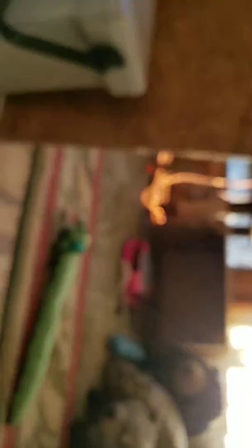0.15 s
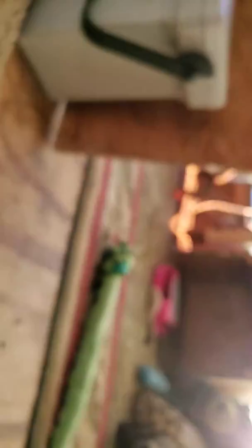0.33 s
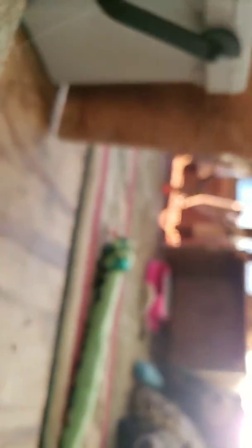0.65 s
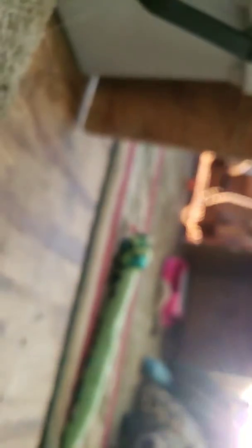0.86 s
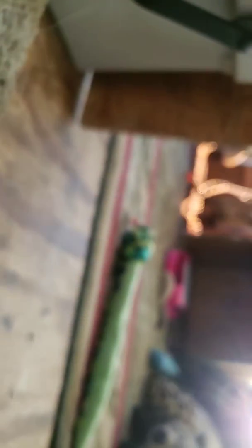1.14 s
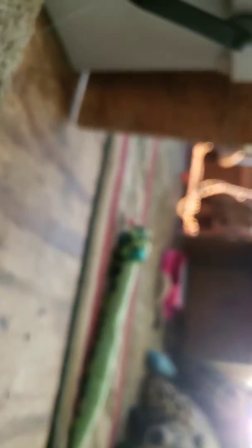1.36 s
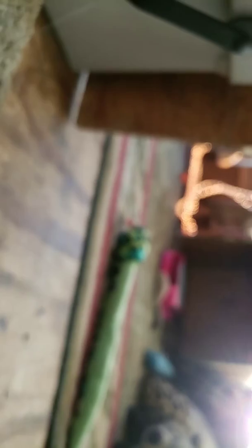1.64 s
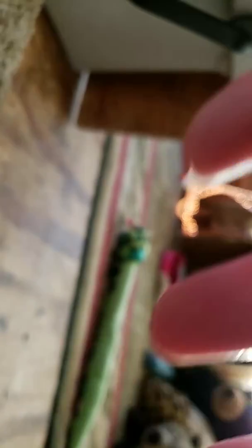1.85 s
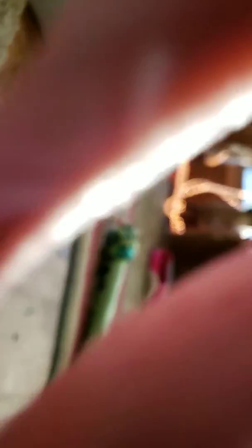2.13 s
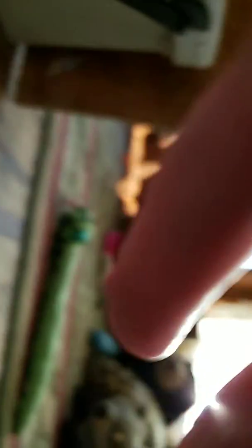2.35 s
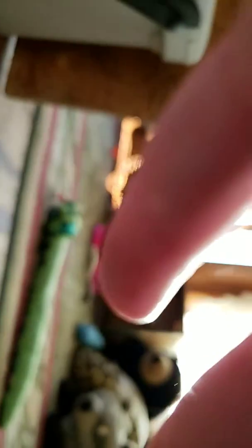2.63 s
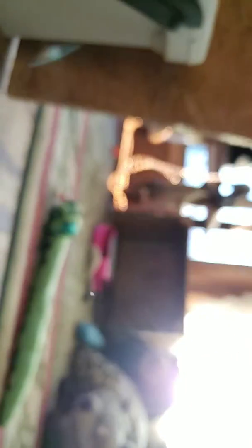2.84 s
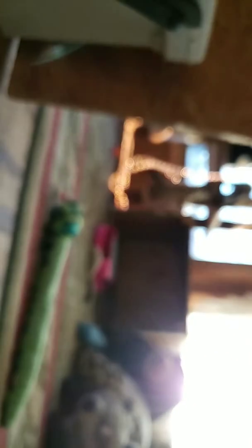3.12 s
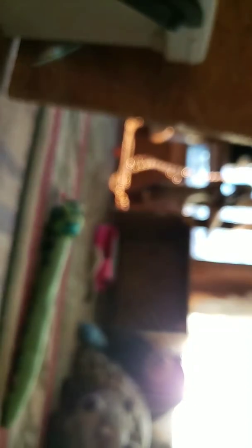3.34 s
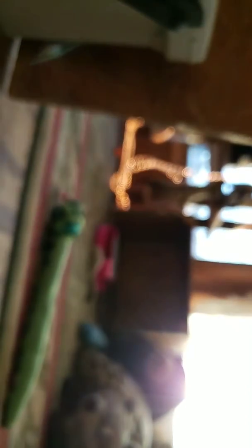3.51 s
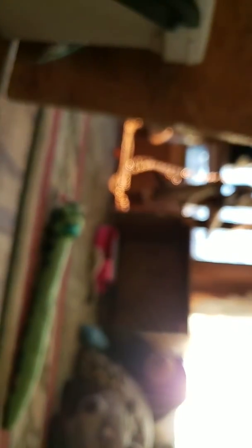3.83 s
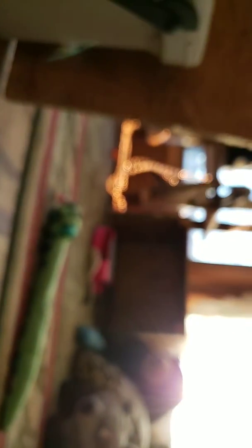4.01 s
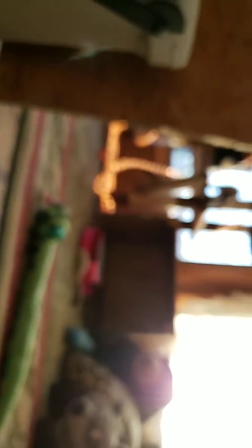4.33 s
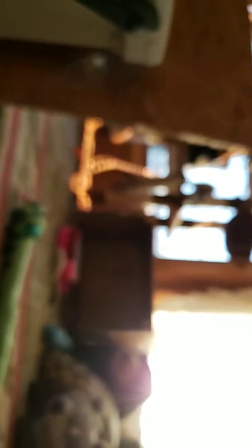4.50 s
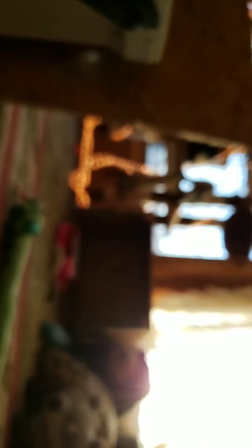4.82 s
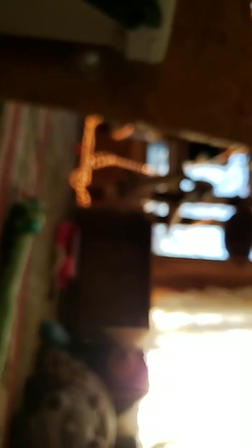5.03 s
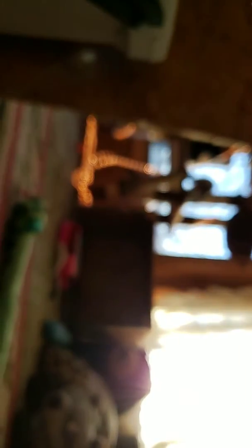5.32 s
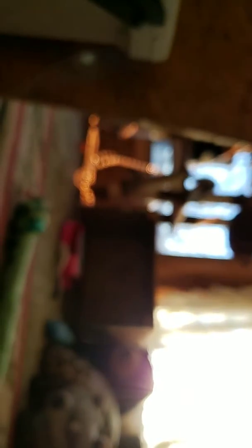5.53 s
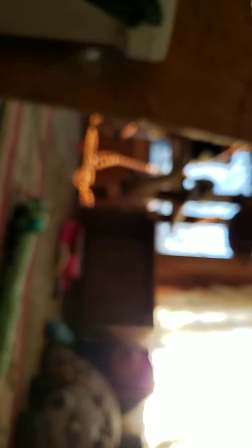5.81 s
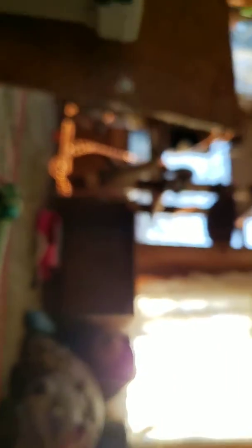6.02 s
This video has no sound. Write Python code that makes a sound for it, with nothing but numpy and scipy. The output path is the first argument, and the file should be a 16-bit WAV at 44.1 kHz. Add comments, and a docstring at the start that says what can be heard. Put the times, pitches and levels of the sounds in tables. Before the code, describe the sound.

Very close handling noise on a stereo hand-held camera: first an uneven hissing palm slide with dull catches and knocks, then crisp skin clicks and bright scuffs mostly on the left. A far motor throbs low in the small room, and padded thuds come and go. After a calmer stretch with few ticks, a weak kitten-like squeak slides upward over a scrape, and a run of woody knocks closes the scene.

```python
"""A quiet room where kittens play on a rug, heard through a hand-held camera with two microphone ports.
From the start a palm slides on the case, hissing and rubbing for two seconds, and slips make the case knock.
A far appliance hums and its motor runs in a steady beat; soft thuds, filtered noise bursts, begin within a second.
Then skin ticks and scuffs beside the left port: sharp releases ring its cavity and dense slips hiss.
Near the end one faint harmonic squeak dips and rises, and knocks in quick succession make the case creak."""
import sys
import numpy as np
from scipy import signal
from scipy.fft import rfft, irfft, next_fast_len
from scipy.io import wavfile

SR = 44100
rng = np.random.default_rng(int(sys.argv[2]) if len(sys.argv) > 2 else 0)


def store_pcm(level_fs):
    """Save levels as 16-bit WAV."""
    pcm = np.round(np.clip(level_fs, -1, 1) * 32767).astype(np.int16)
    wavfile.write(sys.argv[1], SR, np.atleast_2d(pcm).T)


N = 271587
TIME = np.arange(N) / SR
LONG = next_fast_len(N, real=True)

# strength of the palm's slide: t/s, reference level/dB
PALM_SLIDE = [(0.0, -60.5), (0.38, -69), (0.612, -66), (1.042, -59.5), (1.48, -62.5), (1.72, -67.5),
              (1.9, -77.5)]
PALM_OFF_S = 1.93  # the rub and the catches end, the last hiss begins to fade
# a fingertip ticks at the left port, then slides on briefly:
# t/s, tick level/dB, tilt/(dB per octave), slide level/dB, right port gain/dB
FINGER_TOUCHES = [(1.9085, -20.5, 4, -54, -26.5), (1.954, -19.5, 2, -45.5, -20),
                  (1.9855, -0.5, 2, -48, -10.5), (2.267, -28.5, 5.5, -66, -10), (2.385, -23, 0, -64.5, -7),
                  (2.4719, -20.5, -1, -60, -4.5), (2.6552, -21, 7.5, -55.5, -17), (2.7052, -1, 6, -60, -22),
                  (3.3097, -24, 9.5, -54, -16), (3.978, 11.5, 4.5, -57.5, -22),
                  (4.046, -33.5, 10, -65, -10), (4.234, -46.5, 15, -64, -18), (4.5637, -36, 6, -66.5, -16),
                  (4.8715, -41, 11.5, -68, -5)]


def amp(db):
    """Level law: decibels to an amplitude ratio."""
    return np.exp(np.asarray(db) * (np.log(10) / 20))


def unit(x):
    """Normalisation to a root mean square of one."""
    return x / np.sqrt(np.mean(x ** 2) + 1e-24)


def read(points, hz):
    """Linear interpolation of a spectrum on a logarithmic frequency axis."""
    f, value = np.transpose(points)
    return np.interp(np.log(hz + 1), np.log(f + 1), value)


def add(mix, s, sound):
    """Superposition: a two-channel sound is summed into the mix at time s."""
    part = mix[:, max(round(s * SR), 0):][:, :sound.shape[1]]
    part += sound[:, :part.shape[1]]


def drift(size, rate_hz):
    """Slow random modulation: straight lines join independent normal values, for an rms of about one."""
    steps = np.arange(size) * 2 * rate_hz / SR
    knots = rng.standard_normal(int(steps[-1]) + 2)
    return np.interp(steps, np.arange(len(knots)), knots) * np.sqrt(3 / 2)


def ports(right_db):
    """Interchannel level difference: gains of the left and right port."""
    return np.array([[1], [amp(right_db)]])


def noise(colour, balance=((1, 0), (2, 0))):
    """Partial coherence: coloured noise, alike at both ports in the bass; their mean has an rms of one."""
    # f/Hz, likeness of left and right (1 = identical)
    likeness = [(60, 0.9), (150, 0.89), (380, 0.29), (950, 0.24), (2380, 0.0067), (5980, 0), (15000, 0.14)]
    f = np.fft.rfftfreq(LONG, 1 / SR)
    a, b = rng.standard_normal((2, 2 * len(f))).view(complex)
    same = np.clip(read(likeness, f), -1, 1)
    lean = amp(read(balance, f) / 2)  # half the level difference goes to each port
    left = a * lean
    right = (same * a + np.sqrt(1 - same ** 2) * b) / lean
    x = irfft(np.array([left, right]) * amp(read(colour, f)), LONG)[:, :N]
    return x / x.mean(0).std()


def still_room(level_db=-74.5):
    """Stationary random noise: the faint background of the still room."""
    # f/Hz, level/dB
    colour = [(100, -8.5), (220, -6), (450, -8.5), (620, -11), (870, -6.5), (1400, -17), (1950, -15),
              (2350, -7), (3000, -16), (5300, -14.5), (5950, -9), (7000, -12.5), (8500, -31),
              (10300, -25.5), (12300, -14), (15300, -12.5)]
    # f/Hz, left minus right level/dB
    balance = [(60, 0), (120, -10), (240, 0), (480, -3.5), (950, 6.5), (1890, 11), (3770, 6.5),
               (7520, 12.5), (15000, -1.5)]
    return noise(colour, balance) * amp(level_db)


def damped_contacts(rows, sharpness=3.5, skirt=1.1):
    """Forced damped resonance: a brief uneven push excites one broad mode of a padded contact."""
    out = np.zeros((2, N))
    f = np.fft.rfftfreq(SR // 3, 1 / SR) + 1  # kept off zero for the division
    for s, length, hz, db, right in rows:
        u = np.linspace(0, 1, round(length * SR))
        resonance = (1 + (sharpness * (f / hz - hz / f)) ** 2) ** (-skirt / 2)
        resonance = resonance / (1 + (f / (3 * hz)) ** 2)  # steeper treble loss
        spectrum = rng.standard_normal(2 * len(f)).view(complex) * resonance
        push = np.resize(irfft(spectrum), len(u))
        swell = np.sin(np.pi * u ** 0.67) ** 2
        add(out, s, amp(db) * unit(push * swell) * ports(right))
    return out


def motor(hum_hz=118.3, hum_db=-70, ramp_s=0.12, whirr_db=1, shake_db=4, sway_db=2.0):
    """Periodic load: a far appliance hums on while its motor thumps, whirrs and lifts the low rumble."""
    # tones of the running motor: f/Hz, level/dB
    motor_tones = [(98, 6), (158, 6.5), (600, -9.5), (720, -10.5), (840, -12)]
    # f/Hz, level/dB
    whirr_colour = [(120, -7), (200, 5), (320, 1.5), (480, -13.5), (640, -1), (880, -1), (1100, -12.5),
                    (2000, -26)]
    # f/Hz, level/dB
    rumble_colour = [(20, -16.5), (35, -6.5), (52, 4), (75, -5), (110, -0.5), (150, -16.5), (210, -18.5),
                     (320, -30.5), (700, -65)]
    first_start_s, beat_s, run_delay_s, run_s = .402, .802, .025, 0.53
    thump_s, thump_hz, thump_db = 0.1, 109.2, -55.5
    run_db, run_fall_db_per_s, rumble_db = -69.5, -0.93, -63.5

    # the wrapped clock has the motor already running when the scene opens
    age = (TIME - first_start_s - run_delay_s) % beat_s
    load = np.clip(np.minimum(age, run_s - age) / ramp_s, 0, 1)
    tones = sum(amp(db) * unit(np.sin(2 * np.pi * hz * TIME + .8 * drift(N, 5.1)))
                for hz, db in motor_tones)
    whirr = amp(whirr_db) * noise(whirr_colour)
    running = load * amp(run_db + run_fall_db_per_s * TIME) * (tones + whirr)
    hum = amp(hum_db) * unit(np.sin(2 * np.pi * hum_hz * TIME + .5 * drift(N, 4)))
    rumble = noise(rumble_colour) * amp(rumble_db + shake_db * load + sway_db * drift(N, 3.5))
    starts = np.arange(first_start_s, TIME[-1], beat_s)
    thumps = damped_contacts([(s, thump_s, thump_hz, thump_db, 0) for s in starts], sharpness=3.7, skirt=1.7)
    return thumps + running + hum + rumble


def squeak(rasp_db=-4, start_rough=0.055, end_rough=0.0085, flutter_db=2.5):
    """Harmonic series with frequency jitter: the pitch dips, rises and clears over a low scrape."""
    # pitch: t/s, f/Hz
    pitch = [(5.21, 372), (5.3, 346.3), (5.371, 375), (5.42, 430), (5.49, 458), (5.63, 453), (5.9, 502.5)]
    # first three harmonics: level/dB
    harmonics_db = [-1, -11.5, -26.5]
    level_db, fade_db_per_s, attack_s, release_s = -63, -3.5, 0.016, 0.091
    s, hz = np.transpose(pitch)
    rough = np.interp(TIME, [5.35, 5.5], [start_rough, end_rough])
    turns = np.cumsum(np.interp(TIME, s, hz) * (1 + rough * drift(N, 69.7))) / SR
    tone = sum(amp(part_db) * np.sqrt(2) * np.sin(2 * np.pi * k * turns)
               for k, part_db in enumerate(harmonics_db, 1))
    scrape = noise([(70, 4.0), (150, -3.0), (260, 1.5), (600, -4.5), (950, -11.5),
                    (1400, -19.5), (2500, -28), (8000, -47.5)])  # f/Hz, level/dB
    age = np.maximum(TIME - s[0], 0)
    gate = np.clip(np.minimum(age / attack_s, (s[-1] - TIME) / release_s), 0, 1)
    voice = tone * amp(flutter_db * drift(N, 25)) + amp(rasp_db) * scrape
    return gate * amp(level_db + fade_db_per_s * age) * voice


def thuds():
    """Damped impact: soft thuds and dull rubs, each one broad resonance."""
    # t/s, length/s, centre f/Hz, level/dB, right port gain/dB
    soft_blows = [(.827, 0.12, 210, -54, 1.5), (.838, 0.072, 990, -55, -10), (1.07, 0.13, 1180, -57.5, -17),
                  (1.585, 0.066, 173, -49, -3), (1.591, 0.14, 60.6, -42, -30),
                  (1.686, 0.18, 52.3, -48, -20), (1.728, 0.13, 175, -60.5, -1), (2.04, 0.16, 606, -62, -9),
                  (2.214, 0.019, 260, -40, 1), (2.42, 0.09, 210, -50, -2), (2.418, 0.057, 760, -65, -6),
                  (2.682, 0.084, 110, -52.5, -12.5), (2.715, 0.049, 850, -63.5, -2),
                  (3.78, 0.32, 85, -58, -1.5), (3.919, .19, 164, -60, -3), (5.492, 0.065, 1070, -63.5, -14),
                  (5.809, 0.096, 377, -59.5, 5), (5.894, 0.27, 364, -60.5, 6.5), (6.009, 0.16, 730, -70, 5),
                  (5.97, 0.23, 52, -61.5, 1)]
    return damped_contacts(soft_blows)


def palm(hiss_db=5, rub_db=-60.5, rub_follows=.5, flutter_db=0.46, rub_flutter_db=1.5):
    """Friction noise: the palm slides unevenly; its dull rub stops as it lifts, its hiss lingers."""
    # f/Hz, level/dB
    hiss_colour = [(500, -11), (1200, -0.5), (2500, -1), (7000, 0.5), (8500, -9), (10000, -10),
                   (12000, -2.5), (15000, 0.5)]
    # f/Hz, level/dB
    rub_colour = [(100, 10), (300, 5.5), (800, 3), (1300, -13), (2500, -14.5), (6000, -31)]
    # of the hiss: f/Hz, left minus right level/dB
    hiss_balance = [(60, 5.5), (150, -3), (380, -2), (950, 1.5), (2380, 6.5), (5980, 4.5), (15000, 8.5)]
    lift_s, rest_s = 1.4, 3.3  # the pressure begins to ease; the last hiss ends
    slide_db = np.interp(TIME, *np.transpose(PALM_SLIDE))
    moving = np.interp(TIME, [PALM_OFF_S, rest_s], [1, 0])
    pressing = np.interp(TIME, [lift_s, PALM_OFF_S], [1, 0])
    hiss_level_db = slide_db + hiss_db + flutter_db * drift(N, 33.7)
    hiss = noise(hiss_colour, hiss_balance) * amp(hiss_level_db)
    # the rub follows only part of the slide's level changes
    rub_level_db = rub_follows * (slide_db - slide_db.max()) + rub_db + rub_flutter_db * drift(N, 37.56)
    rub = noise(rub_colour) * amp(rub_level_db)
    return moving * hiss + pressing * rub


def catches(low_hz=1200, high_hz=3500, spread_db=2, right_db=-6):
    """Random stick-slip: the palm catches in small dull rubs whose strength follows its slide."""
    per_s, length_s, level_db = 14, .02, -3.5  # level relative to the slide's reference
    times, slide_db = np.transpose(PALM_SLIDE)
    rows = []
    for u, v, w in rng.random((round(per_s * PALM_OFF_S), 3)):
        s = u * PALM_OFF_S
        hz = low_hz * (high_hz / low_hz) ** v
        db = np.interp(s, times, slide_db) + level_db + spread_db * (2 * w - 1)
        rows.append((s, length_s, hz, db, right_db))
    return damped_contacts(rows)


def room(x, bass_t60=0.27, treble_t60=0.32):
    """Diffuse exponential decay: a small furnished room's tail, weak in treble that dies slightly later."""
    hz, t, z = signal.stft(rng.standard_normal((2, SR // 2)), SR, nperseg=256)
    t60 = read([(300, bass_t60), (8000, treble_t60)], hz)[:, None]
    colour = amp(read([(300, 8.5), (1500, 4), (6000, -14.0)], hz))[:, None]
    decay = np.exp(-np.log(1000) * t / t60)  # 60 dB down after t60
    tail = signal.istft(z * decay * colour, SR)[1]
    return signal.fftconvolve(x.mean(0)[None], tail / np.linalg.norm(tail[0]), axes=1)[:, :N]


def scuffs(grain_db=1.56, grain_hz=350, lift_s=0.032):
    """Sliding friction: skin moves in dense uneven slips, heard as a short coloured hiss."""
    # t/s, length/s, rise/s, level/dB, change over the stroke/dB, fizz/dB, right port gain/dB
    strokes = [(0.884, 0.12, .01, -57.5, -4.5, -22, -13.5), (1.065, 0.12, .01, -53, -5.5, -26, -12),
               (2.067, 0.062, 0.016, -39.5, 0.5, 0, -33), (2.125, 0.087, 0.04, -30.5, -22.5, -4, -29),
               (2.189, 0.4, .01, -63.5, -0.5, -32, -10), (2.702, 0.053, 0.037, -28.5, 3, -3, -25),
               (3.309, .089, 0.0053, -34.5, 0.5, -17.5, -21.5), (3.567, .22, 0.029, -39.5, -16, 2.5, -25.5),
               (3.741, .22, .11, -46, -21.5, -1.5, -33.5), (5.495, .13, .019, -69, -3.5, -9.5, -12),
               (5.888, .17, 0.015, -57, 0, -28, -17), (6.038, .12, 0.034, -48.5, -18, -12, -22)]
    # f/Hz, level/dB
    skin_colour = [(200, -24), (900, -20.5), (1500, -6.5), (2400, 0), (3000, 0), (3900, 4), (4900, 0.5),
                   (6000, -0.5), (7200, 4.5), (8600, -9.5), (11000, -10.5), (15000, -6)]
    slide_s, slide_rise_s, slide_fade_db, slide_fizz_db = 0.097, 0.0016, -11.5, -7.5
    out = np.zeros((2, N))
    slides = [(s, slide_s, slide_rise_s, db, slide_fade_db, slide_fizz_db, right)
              for s, _, _, db, right in FINGER_TOUCHES]
    for s, length, rise, db, fade, fizz, right in strokes + slides:
        t = TIME[:round(length * SR)]
        f = np.fft.rfftfreq(len(t), 1 / SR)
        slips = rng.standard_normal((2, len(t))) * amp(grain_db * drift(len(t), grain_hz))
        fizz_share = read([(2500, 0), (7000, 0.45), (10000, 0.76)], f)  # fizz shifts the treble only
        colour_db = read(skin_colour, f) + fizz * fizz_share
        hiss = unit(irfft(rfft(slips) * amp(colour_db), len(t)))
        press = np.minimum(t / rise, 1) * np.clip((length - t) / min(lift_s, length / 2), 0, 1)
        add(out, s, hiss * press * amp(db + fade * t / length) * ports(right))
    return out


def causal(db):
    """Minimum phase: the impulse with this spectrum whose energy comes earliest."""
    circle = np.concatenate([db, db[-2:0:-1]]) * np.log(10) / 20
    return np.fft.ifft(np.exp(np.conj(signal.hilbert(circle)))).real


def clicks(rows, left_db, right_db, chatter_db, chatter_s, spread_s, lag_s):
    """Impulse excitation with dispersion: a sharp release and dying chatter, coloured on the way to each port."""
    out, f, t = np.zeros((2, N)), np.fft.rfftfreq(2048, 1 / SR), TIME[:2048]
    # bending waves in the case: treble arrives first; lag_s delays the right port
    delay = spread_s / np.sqrt(1 + f / 1000) + np.array([[0], [lag_s]])
    travel = np.exp(-2j * np.pi * np.cumsum(delay, axis=1) * f[1])  # phase integrates group delay
    for s, body, ring, snap, right in rows:
        force_db = read([(450, body), (1300, ring), (1900, ring), (5000, snap)], f)
        slips = rng.standard_normal(len(t)) * np.exp(-t / chatter_s) * (1 - np.exp(-2 * t / chatter_s))
        slips *= amp(chatter_db) / np.linalg.norm(slips)
        slips[0] += 1  # the sharp release
        paths = np.array([causal(force_db + left_db(f)), causal(force_db + right_db(f) + right)])
        impulses = irfft(rfft(paths) * travel)
        add(out, s - spread_s / 2, signal.fftconvolve(slips[None], impulses, axes=1))
    return out


def ticks(octaves=1.42, hump_db=2):
    """Cavity resonance: released skin rings the left port; the right port hears it through the air."""
    # the left port's cavity: f/Hz, level/dB
    cavity = [(60, -5.5), (400, -7), (1000, -4.5), (2200, 1.5), (3100, -6.5), (3900, 2), (4800, -9.5),
              (6000, 1), (7100, 1), (8400, -20), (10500, -25.5), (15000, -20.5)]
    through_air = [(350, 1), (800, 7), (1500, 5), (2600, -2),
                   (7000, -10), (10000, -12.5), (15000, -9)]  # f/Hz, level/dB
    # the middle stands hump_db above bass and treble, apart from the tilt
    snaps = [(s, db - octaves * tilt - hump_db, db, db + octaves * tilt - hump_db, right)
             for s, db, tilt, _, right in FINGER_TOUCHES]
    return clicks(snaps, lambda f: read(cavity, f), lambda f: read(through_air, f),
                  chatter_db=-7, chatter_s=0.0008, spread_s=0.0018, lag_s=.0001)


def case_db(f):
    """Modal response: the case's resonances stand on the broad colour of a knock."""
    # f/Hz, level/dB
    knock_colour = [(40, -16), (150, -10.5), (500, -17), (900, -10.5), (1600, -7), (2900, -3), (3600, -6),
                    (5000, 0.5), (7000, -19), (9000, -27), (15000, -25.5)]
    # f/Hz, width/Hz, level above the rest/dB
    modes = [(202, 23, 2), (382, 72, 4.5), (760, 50, 7.5), (1232, 81, 5), (1640, 53, -6), (2020, 96, -0.5),
             (2630, 320, 3.5)]
    peaks = sum(db / (1 + (2 * (f - hz) / width) ** 2) for hz, width, db in modes)
    return read(knock_colour, f) + peaks


def knocks():
    """Stick-slip excitation of modes: each slip rings the case, duller at the right port; a row creaks."""
    # t/s, slips, body level/dB, ring level/dB, snap level/dB, right port gain/dB
    blows = [(0.2408, 2, 2, -16, -54, -0.5), (.2862, 1, -1.5, -12, -46, 1.5), (0.7587, 1, 4.5, 6, -17.5, 2),
             (0.8769, 1, -12, 19.5, -6, -1), (0.944, 1, -16, -7, -22, -10), (1.0634, 1, -24, 4.5, -4, -8),
             (2.2175, 2, 11.5, 11, -13.5, -5.5), (4.2873, 1, -14, -16, -55.5, 3),
             (4.9396, 1, -10.5, -25.5, -50.5, 6.5), (4.951, 1, -9.5, -27.5, -58, -4),
             (5.213, 1, -21, -26.5, -60, 1), (5.1, 1, -26, -32, -51.5, 3), (5.69, 1, -13.5, -26.5, -44, -7),
             (5.823, 1, -4.5, -23, -44.5, 2.5), (5.8529, 1, -0.5, -13, -40.5, 6.5),
             (5.911, 2, 7.5, 1, -23, 3), (5.9412, 3, 4.5, 1, -42, 3), (5.9995, 2, 8, 1, -17.5, 2),
             (6.023, 1, -18, -3.5, -50, 2)]
    # what the right port keeps of a knock: f/Hz, level/dB
    far_side = [(100, -1.5), (450, 8.5), (850, -5), (1800, -5.5), (2800, -19.5), (5000, -20.5),
                (15000, -13.5)]
    slip_gap_s, slip_loss_db = .0059, -0.16  # from one slip to the next
    slips = [(s + k * slip_gap_s, *(np.array(colour) + k * slip_loss_db), right)
             for s, count, *colour, right in blows for k in range(round(count))]
    return clicks(slips, case_db, lambda f: case_db(f) + read(far_side, f),
                  chatter_db=-3.5, chatter_s=0.0031, spread_s=.0015, lag_s=0)


def scene():
    """Superposition: handling close by, the room and its murmur of machinery behind."""
    knock, tick, scuff = knocks(), ticks(), scuffs()
    echo = room(amp(-21.0) * knock + amp(-25.5) * tick + amp(-19) * scuff) * ports(0.5)
    background = still_room() + motor() + squeak() + thuds()
    handling = palm() + catches() + scuff + tick + knock
    return background + echo + handling


def record(dry):
    """Hard clipping just under full scale, then band limiting by a linear-phase low-pass."""
    low_pass = signal.firwin(511, 15600, window=("kaiser", 8), fs=SR)  # edge in Hz
    return signal.oaconvolve(np.clip(dry, -.9, .9), low_pass[None], "same")


dry = scene()
out = record(dry)
store_pcm(out)
```